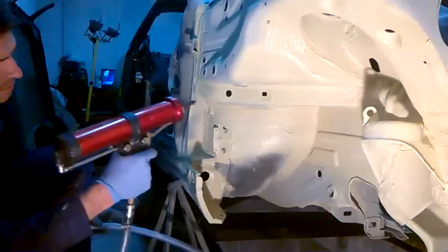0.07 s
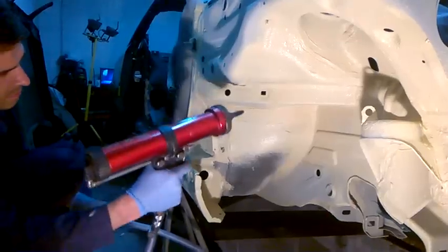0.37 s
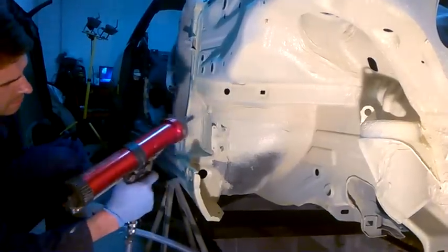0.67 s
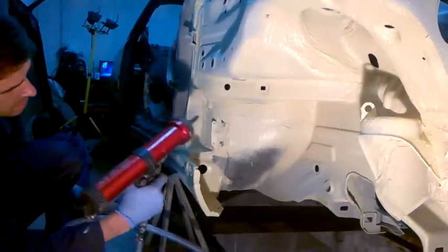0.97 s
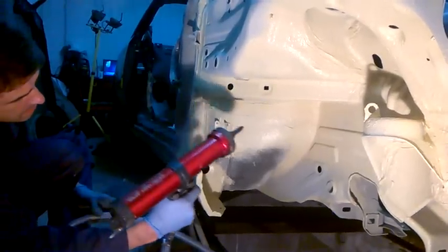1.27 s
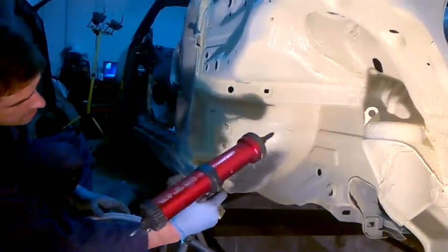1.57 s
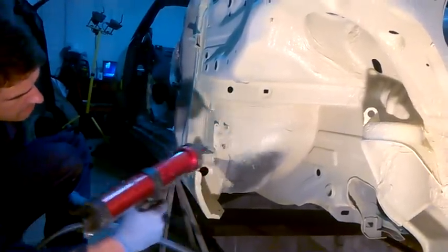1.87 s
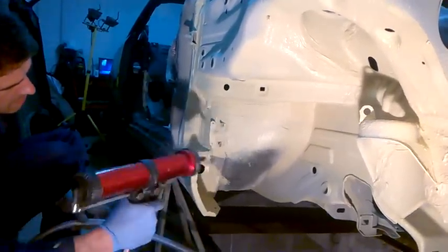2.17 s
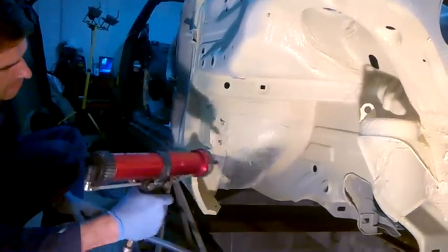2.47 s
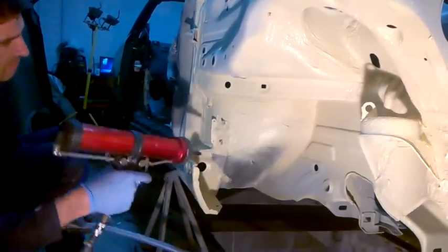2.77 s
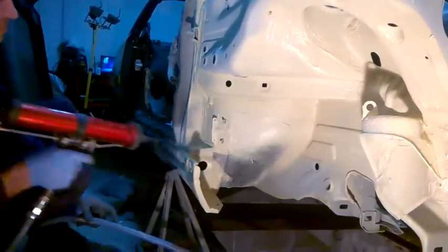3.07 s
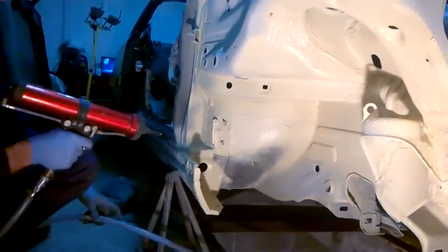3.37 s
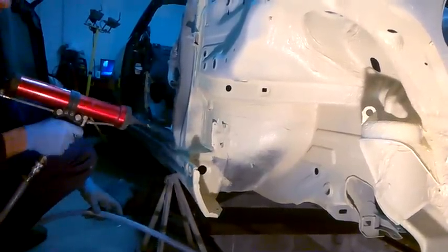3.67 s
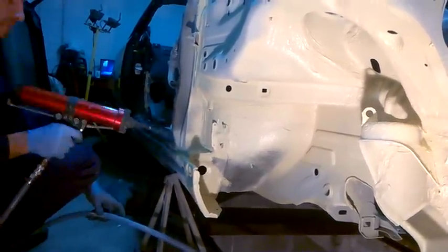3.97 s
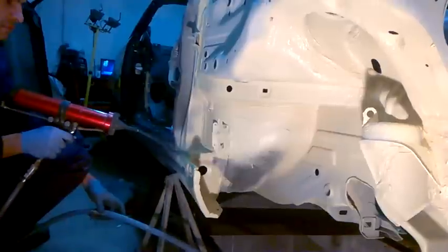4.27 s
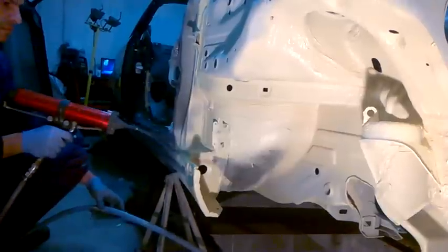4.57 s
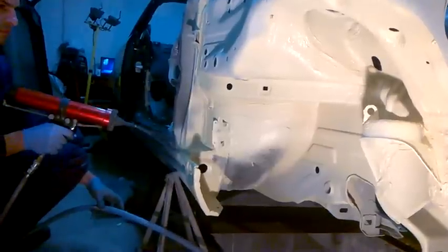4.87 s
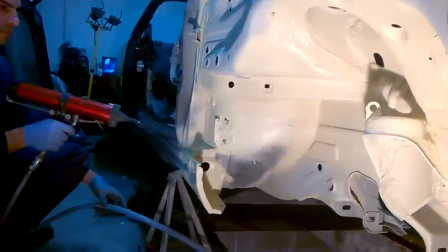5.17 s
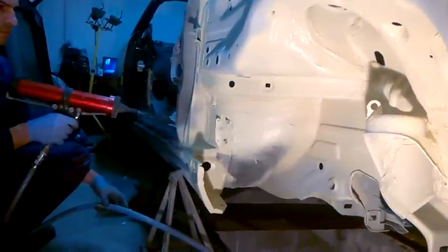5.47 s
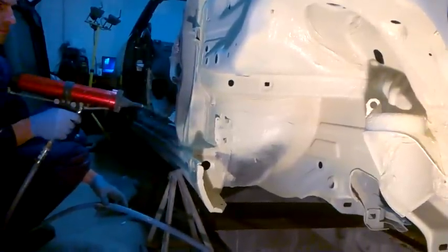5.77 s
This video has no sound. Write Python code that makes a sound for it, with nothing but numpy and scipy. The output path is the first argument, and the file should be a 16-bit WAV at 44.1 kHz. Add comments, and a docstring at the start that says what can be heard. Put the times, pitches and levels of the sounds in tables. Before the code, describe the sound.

An air-driven sealant gun sprays a car body in a workshop, hissing with a hoarse, wavering whistle and spluttering through thick sealant. It stops with one sharp, loud puff of vented air. After a brief pause it blows plain air, spits in a quick crackling run, then settles into an even spray. A compressor hums steadily in the background, all heard from one microphone with a short room echo.

```python
"""An air-driven sealant gun sprays a car body in a workshop, heard as from one mono microphone.
Close to the panel its jet hisses, whistles hoarsely and splutters through thick sealant, with a few
faint low bumps; on release the barrel vents in one sharp puff. Pulled again from further back it
blows plain air, spits, then settles to an even spray. A compressor hums in the background."""
import sys
import numpy as np
from scipy import signal
from scipy.fft import rfft, irfft
from scipy.io import wavfile

SR = 44100
rng = np.random.default_rng(int(sys.argv[2]) if len(sys.argv) > 2 else 0)


def output_pcm(signal):
    """Save a mono or channel-first signal as 16-bit PCM at the path in sys.argv[1].

    Samples are clipped to [-1, 1] before scaling.
    """
    pcm = np.clip(np.atleast_2d(signal).T, -1, 1) * 32767
    wavfile.write(sys.argv[1], SR, np.round(pcm).astype(np.int16))


N = 257103
T = np.arange(N) / SR
BIN_HZ = np.fft.rfftfreq(N, 1 / SR)


def amp(db):
    """Decibels to gain."""
    return 10 ** (np.asarray(db) / 20)


def unit(x):
    """Scales to an rms of one."""
    return x / np.sqrt(np.mean(x ** 2) + 1e-20)


def spectrum_at(points, hz):
    """Gain at hz from a table of f/Hz, level/dB, on a log-frequency axis."""
    f, db = np.transpose(points)
    return amp(np.interp(np.log(hz + 1), np.log(f), db))


def curves(rows):
    """Each column after t/s, joined by straight lines in time."""
    times, *columns = np.transpose(rows)
    return [np.interp(T, times, column) for column in columns]


def gate(start, stop, rise, fall):
    """Ramps open from start and shut from stop, all in seconds."""
    return np.clip((T - start) / rise, 0, 1) * np.clip((stop - T) / fall + 1, 0, 1)


def held(start, length, attack, release):
    """An envelope that swells up to start, holds for length and dies away, all in seconds."""
    return np.exp(-np.maximum(start - T, 0) / attack - np.maximum(T - start - length, 0) / release)


def wander(hz, size=16384):
    """Random drift of unit rms, at rates up to about hz."""
    rates = np.fft.rfftfreq(size, T[-1] / size)
    slow = irfft(rfft(rng.standard_normal(size)) / (1 + (rates / hz) ** 4))
    return unit(np.interp(T, np.linspace(0, T[-1], size), slow))


def colour(x, points):
    """Gives x a spectrum, at unit rms."""
    return unit(irfft(rfft(x) * spectrum_at(points, BIN_HZ), N))


def turbulence(flutter_db, flutter_hz):
    """Jet noise whose strength flutters."""
    return rng.standard_normal(N) * amp(flutter_db * wander(flutter_hz))


def resonate(x, hz, width):
    """A steep resonance that follows the pitch hz, at unit rms."""
    carrier = np.exp(2j * np.pi * np.cumsum(hz * np.ones(N)) / SR)
    pole = np.exp(-np.pi * width / SR)
    baseband = signal.lfilter([1], [1, -2 * pole, pole * pole], x * carrier.conj())
    return unit((carrier * baseband).real)


def ringing(modes):
    """Air noise sounding steady resonances, given as f/Hz, width/Hz, level/dB."""
    power = sum((amp(db) * unit(1 / (1 + (2 * (BIN_HZ - hz) / width) ** 2))) ** 2
                for hz, width, db in modes)
    return irfft(rfft(rng.standard_normal(N)) * np.sqrt(power), N)


def edge_tone(pitch, waver, waver_hz, flicker_db):
    """An unsteady whistle whose pitch and strength jitter."""
    turns = np.cumsum(pitch * (1 + waver * wander(waver_hz))) / SR
    return unit(np.sin(2 * np.pi * turns) * amp(flicker_db * wander(58)))


def shifting(x, depth_db, span_hz, span_s):
    """Narrow peaks and dips come and go as the nozzle moves in front of the metal."""
    hz, times, spectra = signal.stft(x, SR, nperseg=1024, noverlap=768)
    across = np.fft.fftfreq(len(hz), hz[1])[:, None]
    along = np.fft.fftfreq(len(times), times[1])
    blur = np.exp(-(across * span_hz) ** 2 - (along * span_s) ** 2)
    patches = unit(np.fft.ifft2(np.fft.fft2(rng.standard_normal(spectra.shape)) * blur).real)
    return unit(signal.istft(spectra * amp(depth_db * patches), SR, nperseg=1024, noverlap=768)[1][:N])


# Jet close to the panel: t/s, air hiss level/dB, droplet rush level/dB before its lift
CLOSE_LEVELS = [(.05, -34, -34.5), (.21, -32.5, -31.3), (.63, -31.5, -28.5), (.8, -34.5, -32.5),
                (.99, -36, -31), (1.23, -32.3, -29), (1.98, -32, -30.5), (2.2, -34, -32), (2.78, -34, -33)]
# Spectra of the air hiss and of the droplet rush at that distance: f/Hz, level/dB
CLOSE_HISS_SPECTRUM = [(100, -20), (600, -5), (1000, 1.5), (3000, 1.5), (6500, 2), (8000, 1), (9300, -0.5),
                       (11300, 2.5), (13000, 1), (15000, 0), (16000, -6)]
CLOSE_RUSH_SPECTRUM = [(100, -26), (600, -7.5), (1150, -7.5), (1600, 0.5), (2000, 3), (2500, 1.5),
                       (2950, -1.5), (3600, -0.5), (4400, -2), (5900, -5.5), (7200, -18), (10000, -26)]
# Pitch of the nozzle whistle: t/s, f/Hz
WHISTLE_PITCH = [(0.05, 2012), (0.34, 1990), (0.6, 2233), (0.69, 2032), (1.14, 2180), (1.22, 2034),
                 (1.6, 1960), (1.64, 2066), (2.16, 1962), (2.29, 2164), (2.51, 1970), (2.66, 2087),
                 (2.76, 1860), (2.8, 1920)]
# Surges of that whistle: t/s, length/s, level/dB
WHISTLE_SURGES = [(.5, 0.29, -31), (0.843, .03, -28), (1.079, .1, -27.5), (1.263, .08, -31.5),
                  (1.822, .004, -23), (1.95, 0.027, -34), (2.35, 0.083, -26.8), (2.53, 0.085, -27)]

def close_spray(rush_lift_db=1.4, whistle_db=-30, fade_db_per_s=1):
    """Nozzle close to the seam: air hisses, atomised sealant rushes, a hoarse whistle shifts and surges."""
    air_db, rush_db = curves(CLOSE_LEVELS)
    pitch, = curves(WHISTLE_PITCH)
    air = colour(turbulence(flutter_db=0.57, flutter_hz=120), CLOSE_HISS_SPECTRUM)
    air = amp(air_db) * shifting(air, depth_db=1.5, span_hz=220, span_s=0.22)
    rush = colour(turbulence(flutter_db=0.2, flutter_hz=110), CLOSE_RUSH_SPECTRUM)
    rush = amp(rush_db + rush_lift_db) * shifting(rush, depth_db=2.5, span_hz=220, span_s=0.16)
    surge = sum(amp(db) * held(t, length, attack=0.031, release=0.027) for t, length, db in WHISTLE_SURGES)
    strength = np.hypot(amp(whistle_db - fade_db_per_s * T), surge)
    breathy = resonate(turbulence(flutter_db=0, flutter_hz=60), pitch, width=380)
    core = edge_tone(pitch, waver=0.0277, waver_hz=108, flicker_db=-0.5)
    whistle = strength * (amp(-3.5) * breathy + amp(-6) * core)
    return (air + rush + whistle) * gate(0.035, 2.826, rise=0.015, fall=0.0092)


# Bouts of spluttering at the nozzle: t/s, length/s, level/dB, bubbling f/Hz
SPLUTTER_BOUTS = [(.236, 0.021, -23, 419), (0.313, 0.11, -25, 386), (0.631, .04, -26.5, 397),
                  (.755, 0.047, -26, 410), (1.153, 0.048, -36.5, 377), (1.363, 0.047, -31.5, 391),
                  (1.564, 0.1, -29, 700), (1.695, 0.043, -26.5, 672)]
# Spectrum of the tearing sealant: f/Hz, level/dB
SPLUTTER_SPECTRUM = [(40, -32), (110, -57), (200, -9), (330, 1.5), (600, -0.5), (850, 0), (1030, -5),
                     (1280, -4.5), (1600, -1.5), (2600, -9), (6000, -16.5), (12000, -41)]

def splutter(simmer_db=-41.5, simmer_hz=380, clears_s=1.75):
    """Air tears through thick, simmering sealant: lumpy noise with two hollow resonances."""
    bout_power = np.array([amp(db) * held(t, length, attack=0.036, release=0.034)
                           for t, length, db, _ in SPLUTTER_BOUTS]) ** 2
    power = amp(simmer_db) ** 2 + bout_power.sum(0)
    offsets_hz = [hz - simmer_hz for *_, hz in SPLUTTER_BOUTS]
    pitch = simmer_hz + np.dot(offsets_hz, bout_power) / power  # the strongest bout leads the pitch
    strength = np.sqrt(power)
    body = colour(turbulence(flutter_db=3.2, flutter_hz=130), SPLUTTER_SPECTRUM)
    body = shifting(body, depth_db=3, span_hz=200, span_s=0.075)
    hollow = resonate(turbulence(flutter_db=2.5, flutter_hz=90), pitch, width=110)
    upper = resonate(rng.standard_normal(N), 1040, width=114) * strength / strength.max()
    gusts = amp(-2.1) * body + amp(-3.5) * hollow + amp(-5.5) * upper
    return strength * gusts * gate(0.038, clears_s, rise=0.01, fall=0.071)


# Faint low bumps during the close spray: t/s, level/dB
LOW_BUMPS = [(.35, -47), (1.17, -52), (1.65, -46), (1.86, -50), (2.5, -49)]

def low_bumps(bump_hz=168, swell_s=0.037):
    """Faint, soft bumps of narrow low noise that swell and fade."""
    swells = sum(amp(db) / (1 + ((T - t) / swell_s) ** 2) ** 2 for t, db in LOW_BUMPS)
    return swells * resonate(rng.standard_normal(N), bump_hz, width=36)


# Compressor hum in the background: multiple of the shaft rate, relative level/dB
SHAFT_ORDERS = [(1, -7), (2, -4), (3, -27.5), (4, -22), (5, -7.5), (6, -8.5), (7, -4), (8, 1), (9, -5),
                (10, -51.5), (11, -3), (12, -4.5), (13, -5.5), (14, -9.5), (15, -9), (16, -14), (17, -9.5),
                (18, -6.5), (19, -16), (20, -27.5), (21, -14.5), (22, -20.5), (23, -19), (24, -31),
                (25, -17.5), (26, -30), (27, -24), (28, -12.5), (29, -16.5), (30, -15), (31, -18.5)]
# Spectra of the buzz above the hum and of the workshop's room tone: f/Hz, level/dB
BUZZ_SPECTRUM = [(1480, -4), (1700, 1), (1950, -2), (2250, -7.5), (2700, -16), (3600, -9.5), (4700, -16),
                 (5500, -24), (6400, -13), (8000, -33), (11000, -26), (15000, -40)]
ROOM_TONE = [(20, -12.5), (60, -25), (140, -8), (350, -0.5), (800, 0), (1300, -7), (1900, -14.5),
             (2600, -17.5), (4300, -12.5), (8000, -28), (15000, -39)]
# Thin whines of the compressor and its air line: f/Hz, width/Hz, level/dB relative to the hum
LINE_WHINES = [(1953, 8.1, -21.5), (4700, 40, -27.5), (6160, 48, -35), (11030, 110, -39)]

def compressor(shaft_hz=47.14, faint_db=-73, steady_db=-32.5, fade_at_s=0.57, fade_s=0.03):
    """The whole background (shaft hum, buzz, whines, room tone) fades in, then stays level."""
    steps = 4096  # per turn of the shaft
    orders, order_db = np.transpose(SHAFT_ORDERS)
    high_orders = np.arange(len(orders) + 1, steps // 12)
    turns = shaft_hz * T + 0.035 * wander(hz=1) / (2 * np.pi)

    def revolve(multiples, gains):
        """Repeats one turn of the shaft, its strokes smeared by the room."""
        harmonics = np.zeros(steps // 2 + 1, complex)
        harmonics[np.rint(multiples).astype(int)] = gains * np.exp(2j * np.pi * rng.random(len(gains)))
        return unit(np.interp(turns, np.arange(steps) / steps, irfft(harmonics), period=1))

    hum = revolve(orders, amp(order_db))
    scatter = amp(4.5 * rng.standard_normal(len(high_orders)))
    buzz = amp(-14.5) * revolve(high_orders, spectrum_at(BUZZ_SPECTRUM, high_orders * shaft_hz) * scatter)
    air = amp(-13) * colour(rng.standard_normal(N), ROOM_TONE)
    fade_in = (1 + np.tanh((T - fade_at_s) / (2 * fade_s))) / 2
    strength = amp(faint_db + (steady_db - faint_db) * fade_in) * gate(0.036, T[-1], rise=0.03, fall=0.01)
    return strength * (hum + buzz + air + ringing(LINE_WHINES))


# Spectrum of the air leaving the barrel: f/Hz, level/dB
VENT_SPECTRUM = [(200, -41), (900, -13), (1400, -6), (2700, -7), (3600, -2.5), (4900, 0), (5700, -2.5),
                 (6400, 0.5), (7600, -5), (9000, -3), (10800, 0), (13000, -3.5), (16000, -10)]
# Resonances of the emptying barrel: f/Hz, width/Hz, level/dB relative to the jet
BARREL_MODES = [(1583, 54, -14.5), (1740, 84, -19), (2170, 230, -15), (2960, 120, -22), (3645, 62, -15),
                (4150, 90, -13.5), (4850, 90, -16), (5000, 83, -17), (9160, 90, -26)]

def vent(open_s=2.827, level_db=-12.6, sag_db_per_s=36, bright_hz=16200, dulling_s=0.25):
    """The barrel dumps its pressure: a bright jet that dulls as it dies, and a soft push of air."""
    age = np.maximum(T - open_s, 0)
    pressure = amp(level_db - sag_db_per_s * age) * held(open_s, 0.068, attack=0.0013, release=0.036)
    leak = amp(-31) * held(open_s - 0.015, 0.0098, attack=0.008, release=0.0035)  # the valve cracks open
    cutoff_hz = bright_hz * np.exp(-age / dulling_s)
    jet = unit(colour(rng.standard_normal(N), VENT_SPECTRUM) + ringing(BARREL_MODES))
    hz, times, spectra = signal.stft(jet, SR, nperseg=256)
    dulled = spectra / np.sqrt(1 + (hz[:, None] / np.interp(times, T, cutoff_hz)) ** 12)
    jet = signal.istft(dulled, SR, nperseg=256)[1][:N]
    push = amp(-24) * np.sin(2 * np.pi * 85 * age) * np.exp(-age / 0.0091)
    return (pressure + leak) * jet + push


# Spectra of the air hiss and of the droplet rush, further from the panel: f/Hz, level/dB
FAR_HISS_SPECTRUM = [(300, -8.5), (1400, 2.5), (2000, -2), (3100, -1.5), (3800, 2), (4700, 4), (6500, 0),
                     (8000, -0.5), (9300, -2), (11000, 1), (13000, -2.5), (16000, -5.5)]
FAR_RUSH_SPECTRUM = [(500, -24), (1050, -10.5), (1400, -5), (1850, -1.5), (2200, -10), (2450, -7),
                     (2750, -4.5), (3300, -3.5), (3800, -3.5), (4100, -3), (4450, -2.5), (5600, -6.5),
                     (7200, -13), (11000, -21)]
# Nozzle resonances in even spray: f/Hz, width/Hz, level/dB relative to the rush
NOZZLE_MODES = [(1860, 230, -12), (2440, 54, -13.5), (3755, 280, -9.5), (4320, 350, -12)]
# Surges of sealant, heard in rush and whistle: t/s, length/s, whistle level/dB
SEALANT_SURGES = [(4.2, 0.046, -26.5), (4.385, 0.0092, -34), (4.471, 0.047, -29.5), (4.927, 0.11, -36),
                  (5.2, 0.3, -34), (5.675, 0.11, -36)]

def far_spray(air_db=-32, rush_db=-29, whistle_db=-37.5, whistle_hz=2185, sealant_s=3.8,
              thinning_db_per_s=1):
    """Gun held back: plain air, then sealant arrives, the hiss flares and rush and whistle join in."""
    flow = np.sqrt(gate(sealant_s, T[-1], rise=0.23, fall=0.01))
    surge = sum(amp(db) * held(t, length, attack=0.018, release=0.035) for t, length, db in SEALANT_SURGES)
    flare_db = 4.5 * held(3.84, 0.07, attack=0.021, release=0.1)
    dip_db = -3 * held(5.56, 0.06, attack=0.047, release=0.04)
    air = colour(turbulence(flutter_db=0.66, flutter_hz=120), FAR_HISS_SPECTRUM)
    air = amp(air_db + flare_db + dip_db) * shifting(air, depth_db=2, span_hz=200, span_s=0.39)
    rush = colour(turbulence(flutter_db=0.3, flutter_hz=109.7), FAR_RUSH_SPECTRUM)
    rush = shifting(rush, depth_db=3, span_hz=220, span_s=0.08) + ringing(NOZZLE_MODES)
    rush *= np.hypot(amp(rush_db - thinning_db_per_s * (T - sealant_s)), amp(-4) * surge)
    breathy = resonate(rng.standard_normal(N), whistle_hz, width=240)
    tone = unit(breathy + 1.2 * edge_tone(whistle_hz, waver=0.0202, waver_hz=109, flicker_db=0.5))
    strength = np.hypot(amp(whistle_db), surge)
    # the octave grows faster than the tone in a surge
    octave = resonate(rng.standard_normal(N), 2 * whistle_hz, width=280) * (strength / strength.max()) ** 1.1
    whistle = strength * (tone + amp(-2) * octave)
    return air * gate(3.365, T[-1], rise=0.026, fall=0.01) ** 2 + flow * (rush + whistle)


# Slugs of sealant leaving the nozzle, gun still held back: t/s, level/dB, decay/s
SLUGS = [(3.3909, -24, 0.0079), (3.775, -21, 0.0087), (3.815, -19, 0.012), (3.842, -19, 0.012),
         (3.863, -20, .008), (3.892, -19.5, 0.0084), (3.918, -18.5, 0.0043), (3.941, -20, .006),
         (3.966, -19.5, .006), (3.982, -19, 0.0089), (3.997, -23, .008), (4.019, -24.5, .01)]
# Spectrum of their bursts: f/Hz, level/dB
SPIT_SPECTRUM = [(300, -17), (900, -3), (1400, 2), (1900, 3.5), (2600, -3), (3300, -3), (3800, 5.5),
                 (4600, 2.5), (5300, 0), (6000, 0.5), (7000, -13), (11200, -12), (16000, -14)]

def spits(rise_s=0.0015):
    """Each slug bursts into a short crackling puff with a colour of its own."""
    strength = np.zeros(N)
    for t, db, decay in SLUGS:
        age = np.maximum(T - t, 0)
        strength += amp(db) * np.minimum(age / rise_s, 1) * np.exp(-(age / decay) ** 2 / 2)
    crackle = colour(turbulence(flutter_db=1.5, flutter_hz=600), SPIT_SPECTRUM)
    return strength * shifting(crackle, depth_db=2.5, span_hz=300, span_s=0.035)


def workshop(x, echo_db=-12, tail_db=-14, t60_s=0.36):
    """At the microphone: direct sound, quick echoes off the car body and floor, then a short tail."""
    t = np.arange(SR // 2) / SR
    echoes = np.zeros(len(t))
    echoes[(rng.uniform(0.002, 0.016, size=8) * SR).astype(int)] = rng.choice([-1, 1], size=8)
    tail = rng.standard_normal(len(t)) * amp(-60 * t / t60_s) * (t > 0.006)
    response = amp(echo_db) * echoes / np.linalg.norm(echoes) + amp(tail_db) * tail / np.linalg.norm(tail)
    response[0] = 1
    return signal.fftconvolve(x, response / np.linalg.norm(response))[:N]


def scene():
    """The gun in the workshop with the compressor behind it, the same in both channels."""
    gun = close_spray() + splutter() + vent() + far_spray() + spits() + low_bumps()
    return np.tile(workshop(gun) + compressor(), (2, 1))


def record(dry):
    """The recorder's band limit: a steep low-pass at 15850 Hz."""
    taps = signal.firwin(511, 15850, window=("kaiser", 9), fs=SR)
    return signal.oaconvolve(dry, taps[None], "same", axes=1)


dry = scene()
out = record(dry)
output_pcm(out)
```